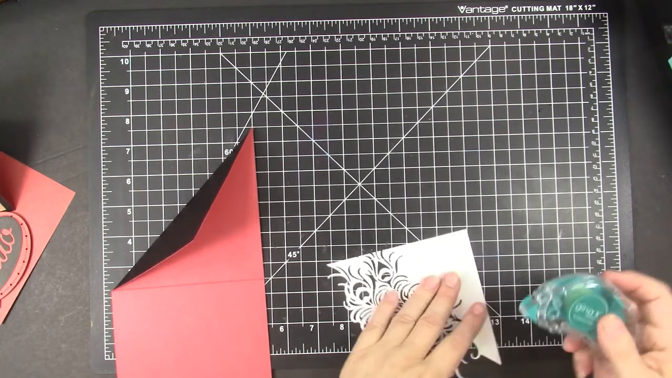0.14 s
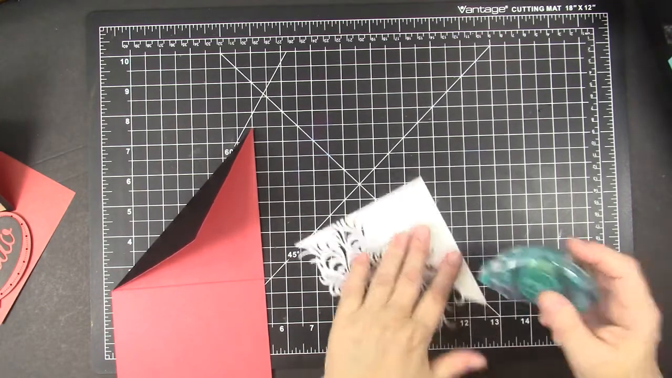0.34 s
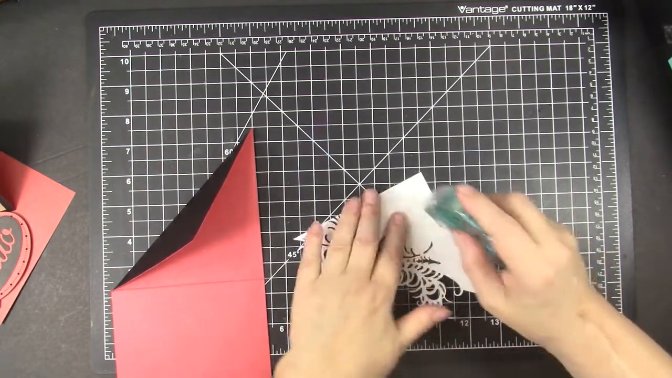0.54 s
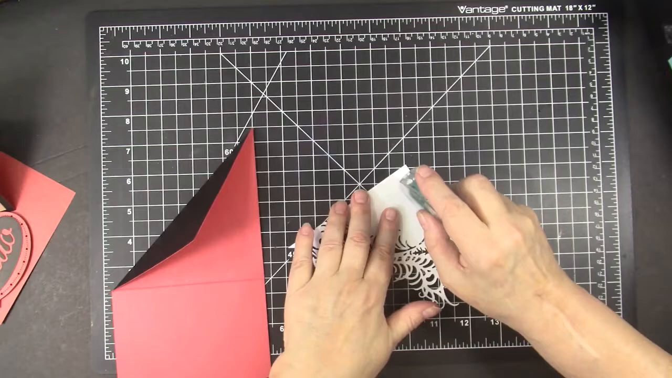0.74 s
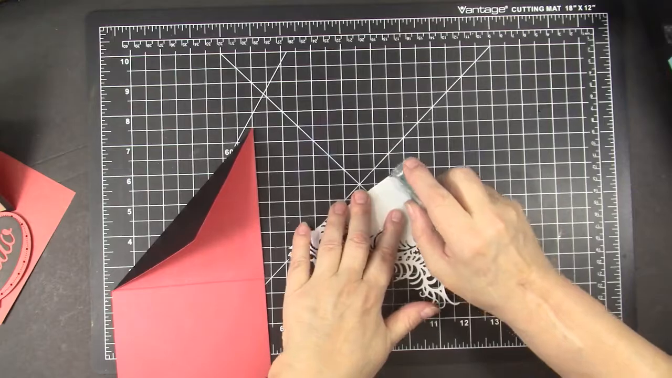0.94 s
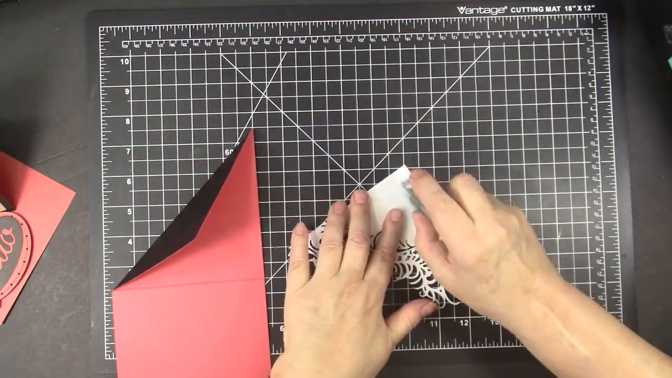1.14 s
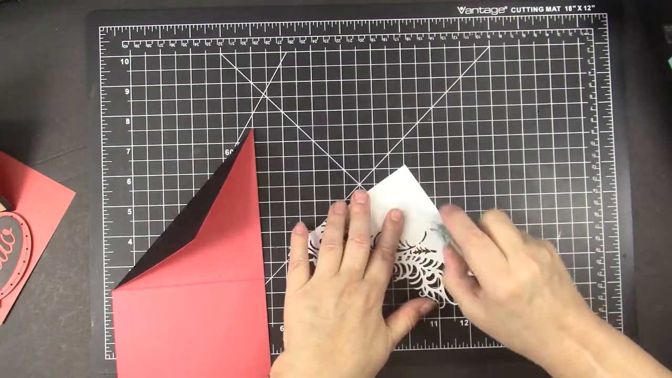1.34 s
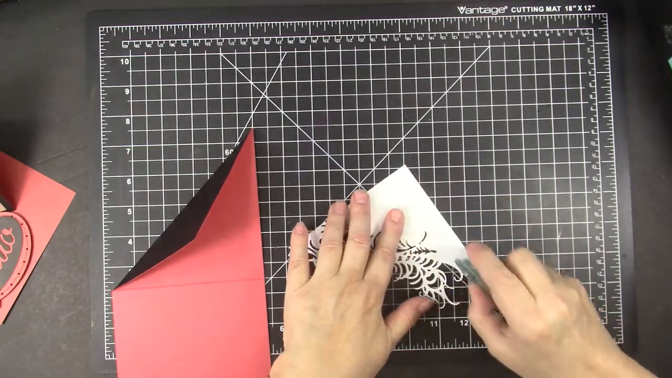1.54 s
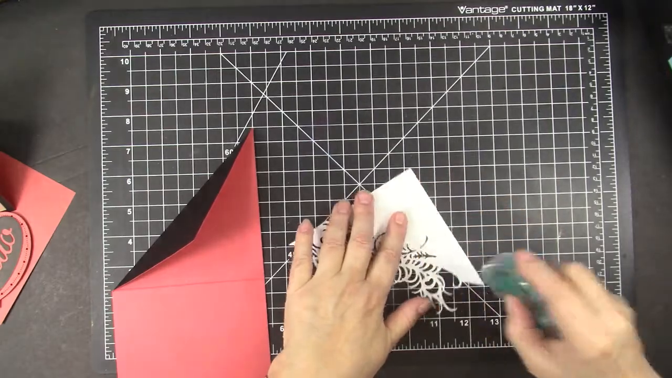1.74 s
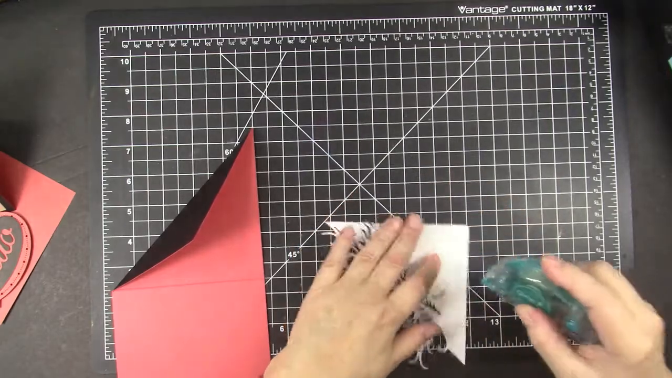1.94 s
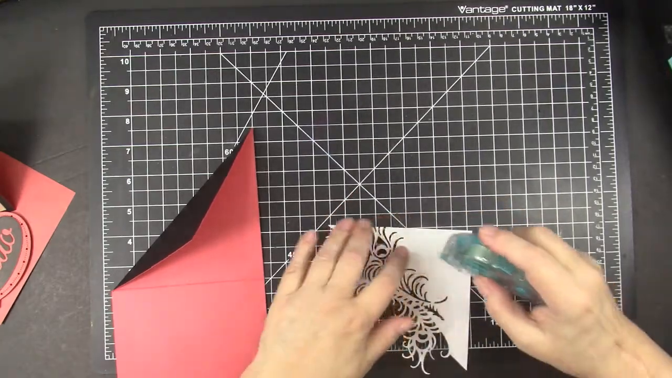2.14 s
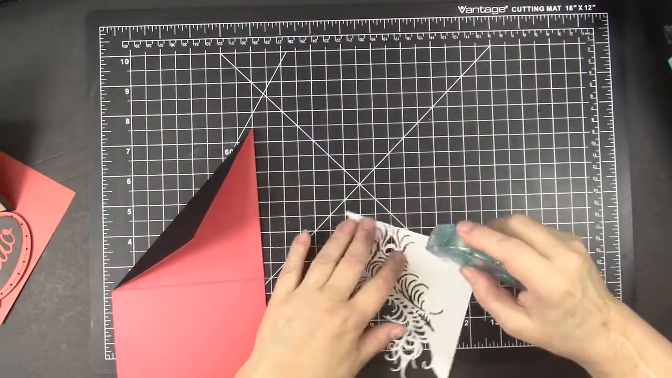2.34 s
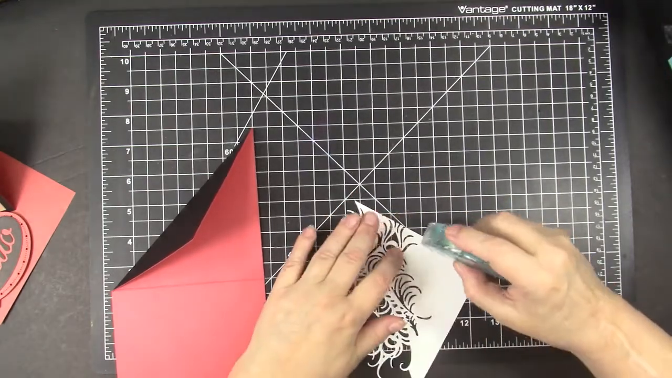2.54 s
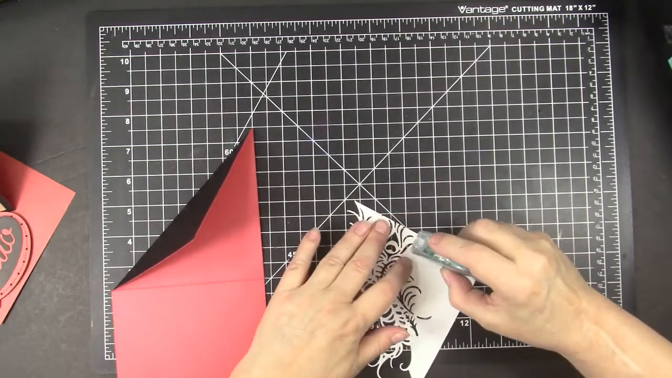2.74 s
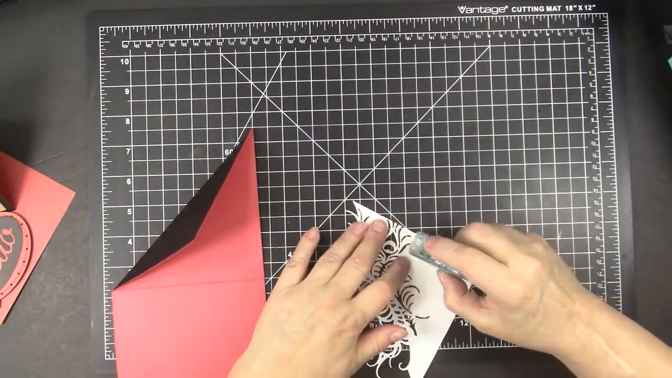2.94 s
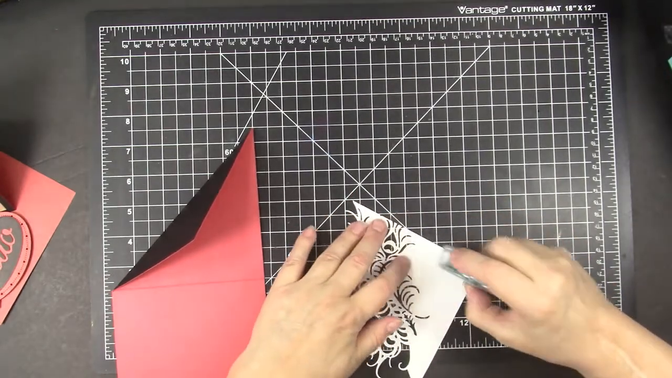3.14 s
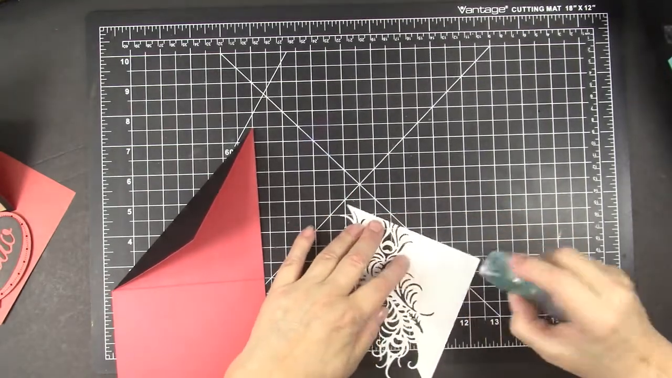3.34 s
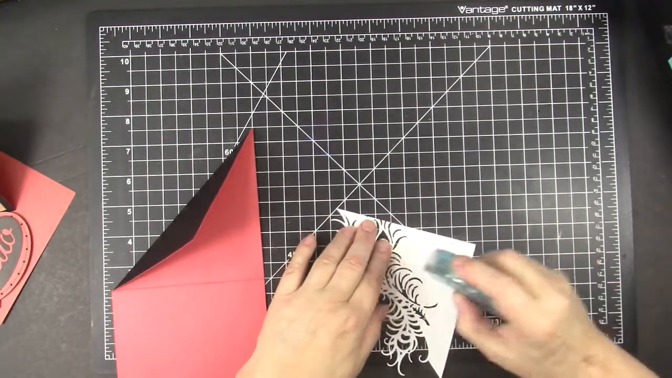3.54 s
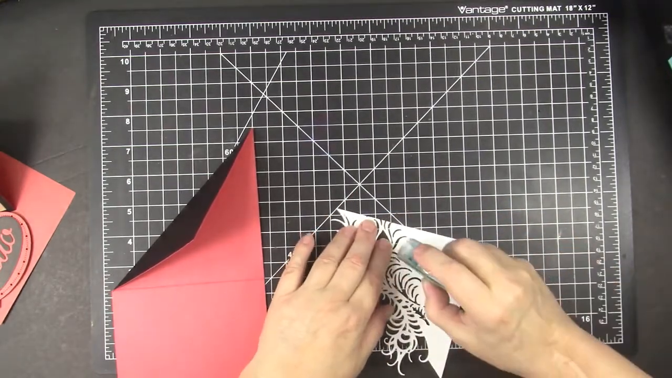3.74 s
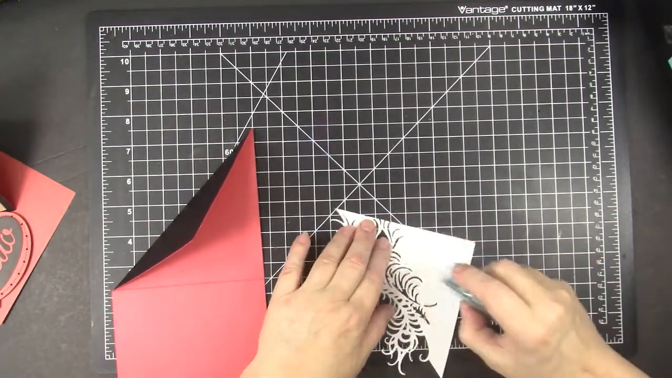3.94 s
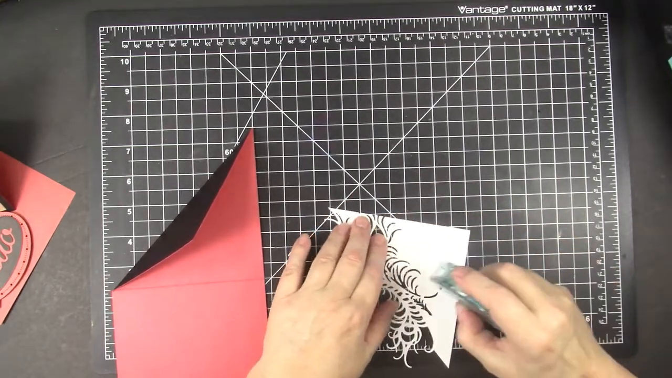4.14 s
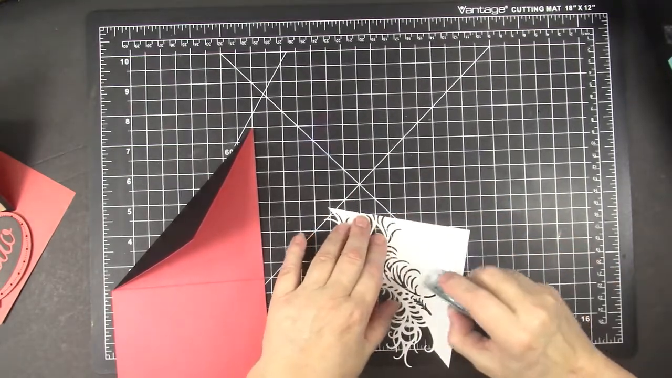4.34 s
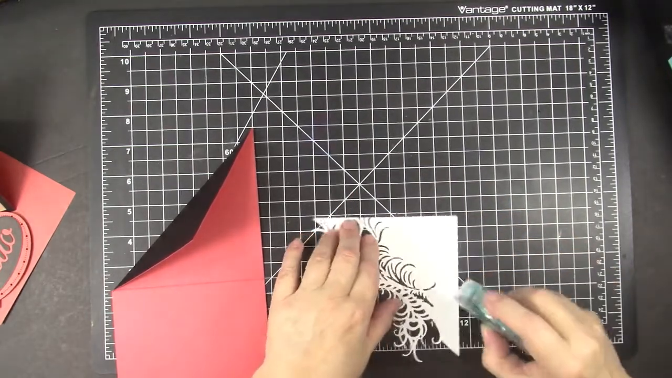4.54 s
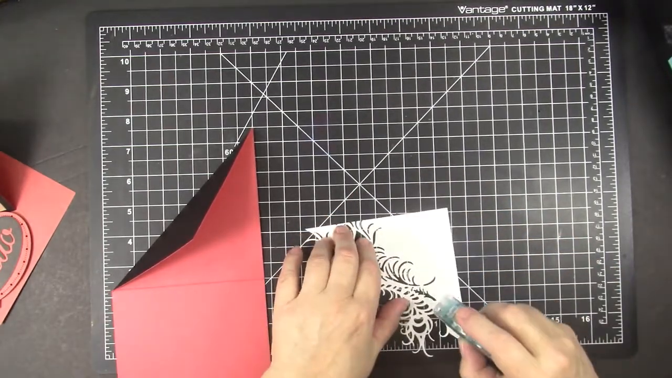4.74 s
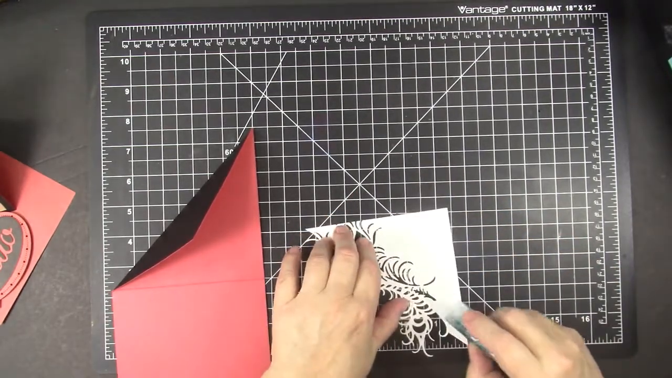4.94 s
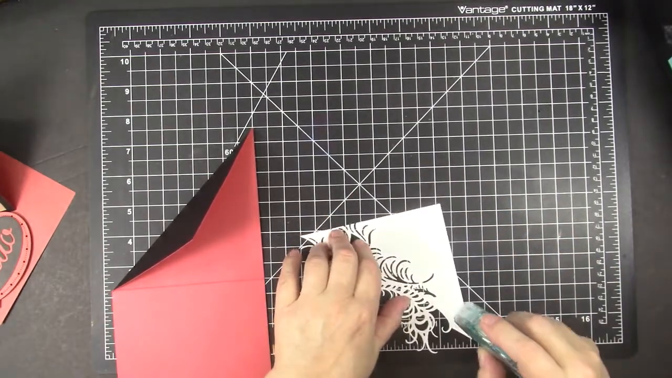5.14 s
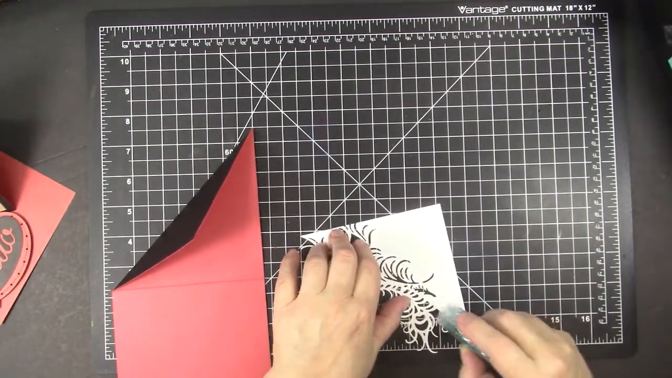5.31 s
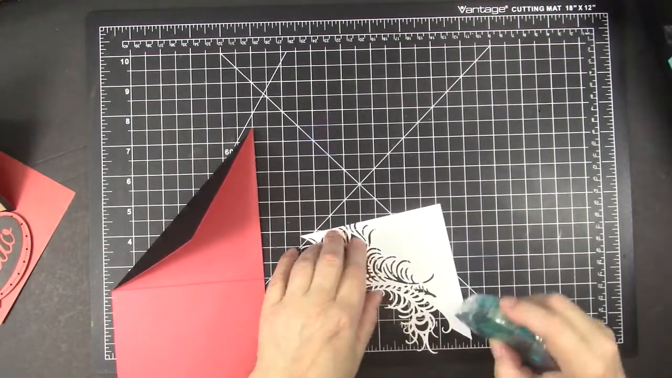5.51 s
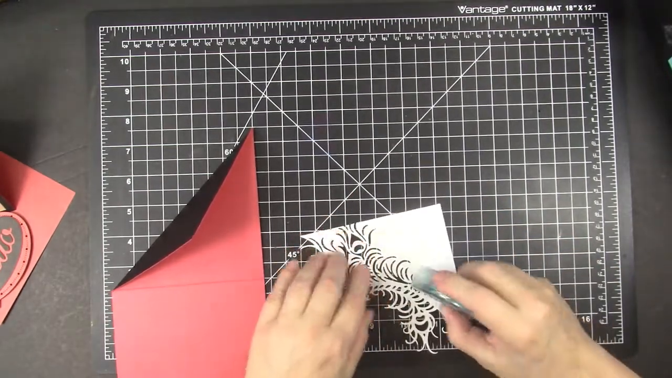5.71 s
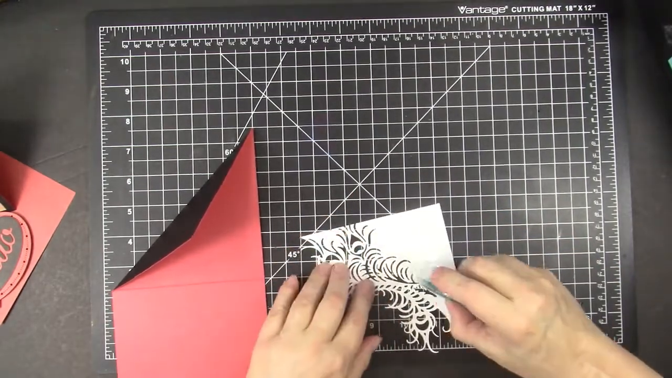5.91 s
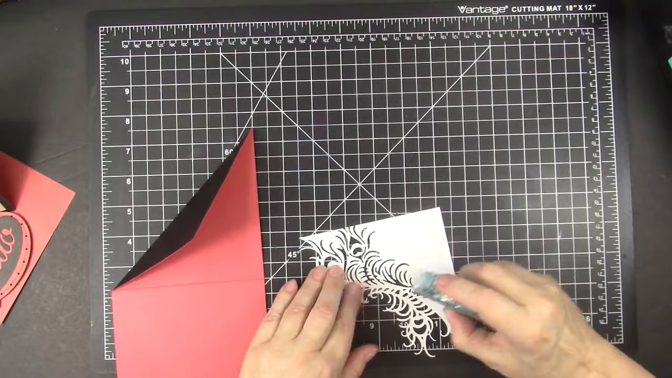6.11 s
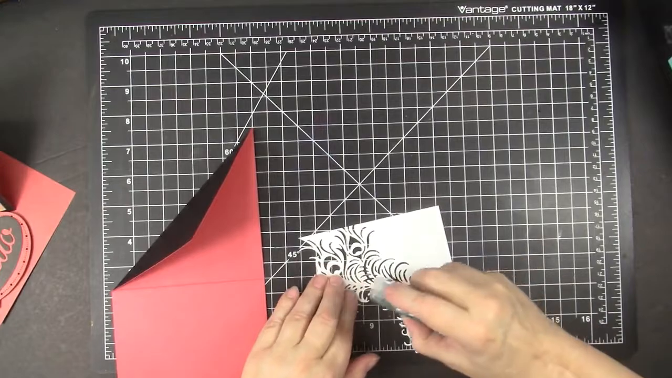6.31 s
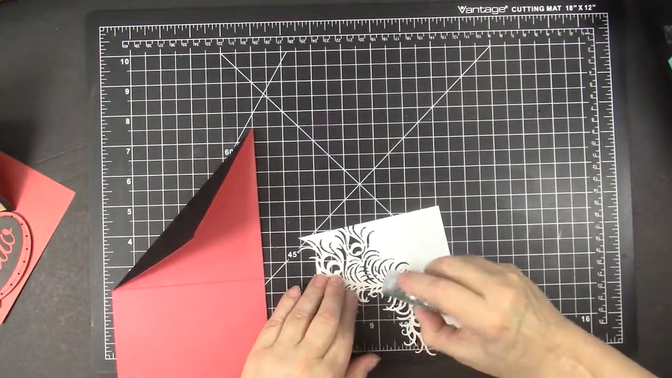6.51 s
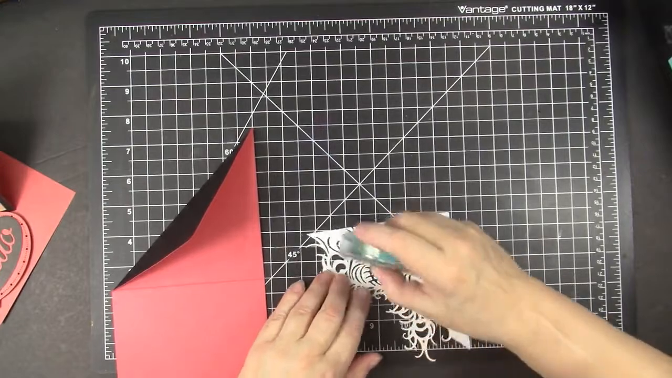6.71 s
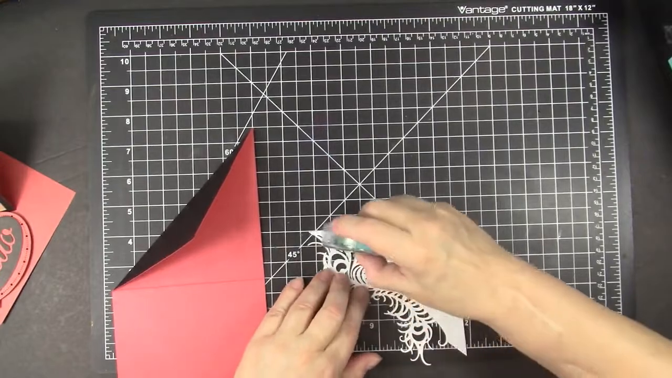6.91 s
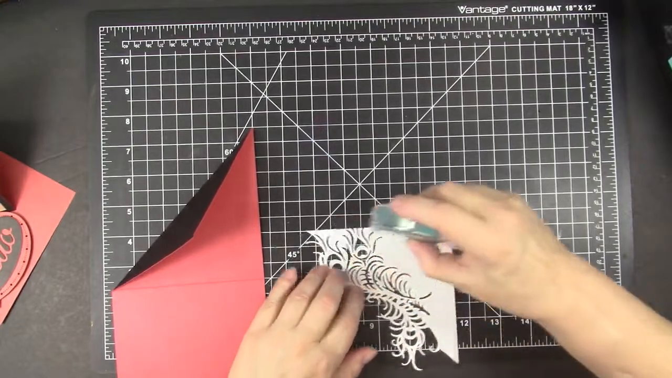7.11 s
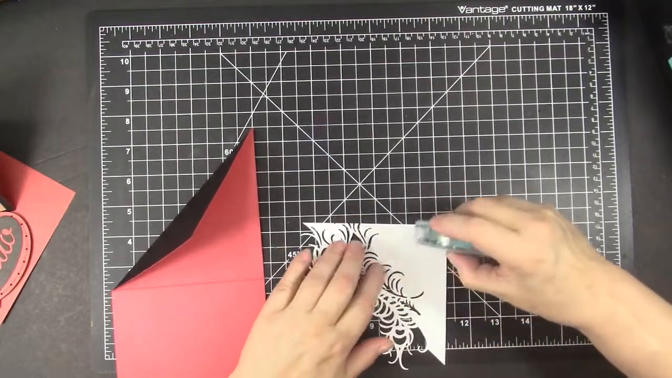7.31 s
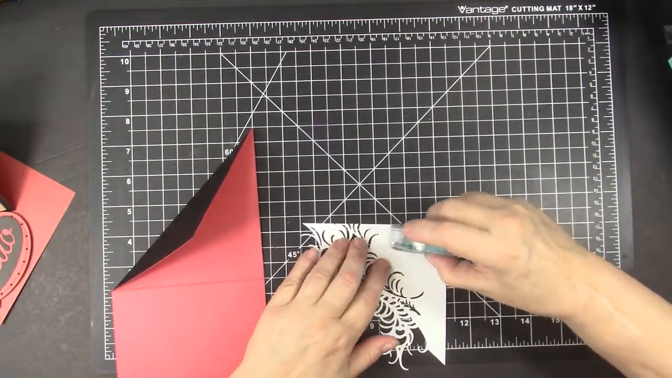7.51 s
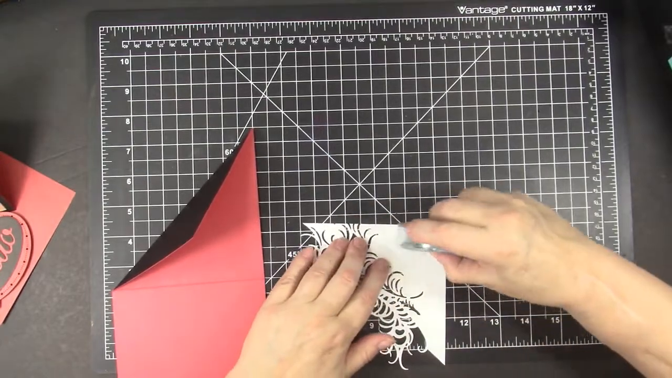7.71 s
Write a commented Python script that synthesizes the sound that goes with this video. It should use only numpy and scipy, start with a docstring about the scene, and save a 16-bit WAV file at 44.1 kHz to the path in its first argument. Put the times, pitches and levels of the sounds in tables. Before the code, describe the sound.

A hollow plastic dispenser clicks and grinds over paper on a desk, heard near the microphone with little echo. It opens with a sharp tick and paper hiss, then a long rapid ratchet run. After more paper sliding comes a second run, followed by brief zips of a few clicks, with taps, bouncing landings and loose ticks between them, over low room noise.

```python
"""In a quiet room with a faint hum, a plastic tape runner is set down on paper and rolled in short strokes.
A sheet slides over a cutting mat as shaped noise; loose parts tick, and pats and landings strike mat and desk.
The pawl clicks once a ratchet tooth and roller and gears grind, all as impacts or rough noise that
excite damped resonances of shell, cavity, mat and desk. Sparse echoes add the room."""
import sys
import numpy as np
from scipy import signal
from scipy.fft import rfft, irfft, next_fast_len
from scipy.io import wavfile

SR = 44100
rng = np.random.default_rng(int(sys.argv[2]) if len(sys.argv) > 2 else 0)


def waveform_to_disk(signal):
    """Save audio, clipped to [-1, 1], as 16-bit WAV at the path in sys.argv[1]."""
    frames = np.transpose(np.atleast_2d(signal))
    scaled = np.clip(frames, -1, 1) * 32767
    samples = np.round(scaled).astype(np.int16)
    wavfile.write(sys.argv[1], SR, samples)


N = 346626  # samples


def gain_of(db):
    """Decibel law: 20 dB is a factor of ten in amplitude."""
    return 10 ** (np.asarray(db) / 20)


def evened(x):
    """Normalisation to an rms of 1."""
    return x / np.sqrt(np.mean(x ** 2) + 1e-20)


def read(points, hz):
    """Interpolation of a curve over logarithmic frequency."""
    f, value = np.transpose(points)
    return np.interp(np.log(hz + 1), np.log(f + 1), value)


def coloured(x, points):
    """Spectral shaping: each frequency is weighted by the curve, then the rms is set to 1."""
    size = next_fast_len(N)
    weight = gain_of(read(points, np.fft.rfftfreq(size, 1 / SR)))
    return evened(irfft(rfft(x, size) * weight, size)[:N])


def grit(per_s, spread_db, smooth):
    """Granular friction: noise roughened by random grains of uneven size."""
    grain_db = spread_db * np.minimum(rng.exponential(1, N), 4)
    grains = gain_of(grain_db) * (rng.random(N) < per_s / SR)
    lumps = signal.oaconvolve(grains, np.exp(-np.arange(400) / 60))[:N]
    return evened((smooth + evened(lumps)) * rng.standard_normal(N))


def blows(s, db, snap_db, rise, fall):
    """Impact excitation: a clean snap at each time, and a rattle of micro-impacts that dies away."""
    train, t = np.zeros(N), np.arange(2048) / SR
    np.add.at(train, np.clip((s * SR).astype(int), 0, N - 1), gain_of(db))
    shape = (1 - np.exp(-t / rise)) * np.exp(-t / fall)
    rattle = abs(signal.oaconvolve(train, shape / shape.max())[:N]) * rng.standard_normal(N)
    return rattle + gain_of(snap_db) * train


def ring(drive, modes, rise, alternate=True):
    """Modal superposition: damped sines, in step or of alternate sign, swell over the contact time."""
    t = np.arange(4096) / SR
    shape = 0
    for k, (hz, width, db) in enumerate(modes):
        sign = (-1) ** (k * alternate)
        decay = np.exp(-np.pi * width * t)
        shape = shape + sign * gain_of(db) * width * decay * np.sin(2 * np.pi * hz * t)
    shape = shape * (1 - np.exp(-t / rise))
    # unit energy: steady white noise passes at unchanged level
    return signal.oaconvolve(drive, shape / np.linalg.norm(shape))[:N]


def resonate(x, hz, width):
    """Heterodyne resonance of gain 1: shift the curve hz to zero, smooth twice, shift back."""
    turn = np.exp(2j * np.pi * np.cumsum(hz) / SR)
    r = np.exp(-np.pi * width / SR)  # one smoothing pass
    smoothed = signal.lfilter([(1 - r) ** 2], [1, -2 * r, r * r], x / turn + 1e-18)
    return 2 * (turn * smoothed).real


# spectrum of the room noise: (frequency [Hz], relative density [dB per Hz])
AIR_SPECTRUM = [(12, -46), (20, -13), (81, -22.5), (107, -10), (183, -5), (216, -4.5), (379, -3), (546, -4),
                (628, -7), (722, -7.5), (879, -7.5), (1340, -9.5), (2280, -15), (5910, -24), (16200, -39)]
AIR_DB = -57  # rms
HUM_HZ, HUM_DB = 120, -72.5  # mean pitch and level


def air():
    """Stationary noise plus a low sine whose phase and level waver together."""
    t = np.arange(N) / SR
    waver = evened(sum(np.sin(2 * np.pi * (f * t + rng.random())) / np.sqrt(f)
                       for f in np.geomspace(.5, 12, 20)))
    hum = np.sqrt(2) * np.sin(2 * np.pi * HUM_HZ * t + 0.17 * waver)
    hum = hum * gain_of(HUM_DB + 2.1 * waver)
    return gain_of(AIR_DB) * coloured(rng.standard_normal(N), AIR_SPECTRUM) + hum


# the sheet slides on the mat:
# (start [s], length [s], share of it spent swelling [0-1], hiss level [dB], scrape level [dB])
SLIDES = [(0.0, 0.22, 0.067, -56.5, -47), (0.161, 0.12, 0.25, -56.5, -54), (0.216, 0.2, 0.76, -50, -50),
          (0.571, 0.029, 0.2, -54, -55), (0.623, 0.076, 0.67, -57.5, -54.5), (.8, 0.12, 1, -70, -68),
          (1.737, 0.11, 0.44, -66, -57.5), (1.796, 0.22, 0.58, -52.5, -53), (2.144, 0.068, .5, -72, -67),
          (2.228, 0.042, .4, -59, -61), (2.277, 0.22, .25, -62, -59.5), (2.403, .22, 0.43, -83, -58),
          (3.394, 0.1, 0.63, -65, -58), (4.48, 0.2, 0.69, -65, -61), (5.444, 0.29, .25, -71, -64.5),
          (5.627, 0.25, 0.64, -71, -65), (6.527, 0.24, 0.44, -79, -57.5), (6.66, 0.3, 0.37, -68, -61),
          (7.072, 0.16, 0.72, -67, -67)]
SLIDE_BLUNT = 0.87  # power of the swell: smaller is flatter


def sliding():
    """Amplitude envelopes of hiss and scrape: each slide swells and fades."""
    t, out = np.arange(N) / SR, 0
    for start, length, share, hiss_db, scrape_db in SLIDES:
        done, share = (t - start) / length, np.clip(share, .05, .95)
        swell = np.clip(np.minimum(done / share, (1 - done) / (1 - share)), 0, 1) ** SLIDE_BLUNT
        out = out + swell * gain_of([[hiss_db], [scrape_db]])
    return out


# spectra of fibres and of the sheet's edge: (frequency [Hz], relative density [dB per Hz])
HISS_SPECTRUM = [(1760, -31), (3000, -14), (4050, -7), (5220, -16), (6220, -5.5), (8050, -4), (10400, -2.5),
                 (14400, -16), (16000, -21)]
SCRAPE_SPECTRUM = [(120, -49), (200, -14), (281, -7.5), (470, 2), (512, -7), (661, 3.5), (999, -1),
                   (1600, 0.5), (6000, -8), (7800, -57), (13200, -120)]


def sheet():
    """Sliding friction: fibres hiss and the edge of the sheet scrapes."""
    hiss, scrape = sliding()
    hiss = hiss * coloured(grit(590, 4.7, 1.7), HISS_SPECTRUM)
    return hiss + scrape * coloured(grit(230, 5.6, 2.9), SCRAPE_SPECTRUM)


# loose parts tick in the shell: (time [s], shell body level [dB], pitch the struck spot favours [Hz],
# cavity relative to body [dB], treble relative to body [dB])
TICKS = [(0.0054, -15.5, 2740, -8, -16), (0.0704, -34, 2610, -7, -16), (0.1552, -39, 2890, -6, -18),
         (0.5192, -49, 3480, 0, -16), (0.6487, -38, 2940, -2, -16), (0.6584, -43.5, 2450, 5.5, -13),
         (1.064, -30, 2800, -6.5, -20), (1.0875, -31.5, 2620, -11, -28), (1.1017, -25, 2720, -12, -23),
         (1.117, -26, 2930, -14, -23), (1.2386, -26, 2770, -22, -16), (1.341, -27, 3200, -6.5, -16),
         (1.5712, -33, 2750, -3, -16), (1.6069, -27.5, 2610, -4.5, -24), (1.7025, -27, 3070, -5.5, -12),
         (1.8018, -27, 2570, -15, -16), (1.818, -40, 3090, -4, -20), (1.8382, -40, 2860, -6, -16),
         (2.0415, -46, 2420, -5, -18), (2.8069, -36, 2940, 0.5, -21), (2.8174, -59, 2850, -7, -16),
         (2.9599, -41, 3150, -15, -16), (3.0076, -48, 3040, -9, -21), (3.024, -45, 3100, -7, -24),
         (3.346, -25.5, 2890, -5.5, -9.5), (3.3944, -38, 2440, -5, -16), (3.4034, -40, 3500, -10, -16),
         (3.419, -37, 3110, -13, -16), (3.4437, -46, 3170, -13, -16), (3.5165, -44.5, 3270, -8, -20),
         (3.8242, -26.5, 3150, -9.5, -16), (4.0247, -43, 2850, -9, -6), (4.0394, -52, 2660, -9, -10),
         (4.0911, -52, 2810, -7, -16), (4.144, -44.5, 2880, -7, -21), (4.4967, -37, 2920, -14, -16),
         (5.025, -31, 2840, -6, -12), (5.0646, -34, 2820, 2, -7), (5.127, -39, 2860, -7, -21),
         (5.1414, -56, 2480, -7, -16), (5.3423, -25.5, 2840, -10, -16), (5.5546, -40, 2950, -16, -25),
         (5.625, -43, 2610, -16, -16), (5.887, -21, 3130, -9, -20), (6.0264, -28, 3170, -8, -12.5),
         (6.4244, -27, 3180, -9, -22), (6.5084, -38, 2490, -2, -16), (6.5203, -34, 2400, -10, -6),
         (6.6276, -46.5, 2450, -9, -16), (6.8695, -41, 2610, -8, -19), (6.9352, -34, 2740, -2.5, -18),
         (7.0263, -37.5, 3310, -3, -14), (7.073, -45, 2510, -2, -9), (7.1272, -49, 2510, -1, -16),
         (7.1736, -38, 3130, -5, -24), (7.3625, -38, 3080, -8.5, -19), (7.5724, -45, 2960, -9, -12),
         (7.6863, -32, 2900, -3.5, -26)]
TICK_MAT_DB, TICK_DESK_DB = -18.5, -32  # relative to body


def ticks():
    """Impact of light parts: the shell answers most, the mat and desk little."""
    return [(s, db, hz, cavity_db, TICK_MAT_DB, TICK_DESK_DB, treble_db)
            for s, db, hz, cavity_db, treble_db in TICKS]


# fingers, sheet and roller pat the mat:
# (time [s], mat level [dB], desk relative to mat [dB], treble relative to mat [dB])
PATS = [(0.182, -45, 2.5, 3.5), (0.193, -49, 11.5, -12), (0.5708, -46, -24, -7), (0.5792, -42.5, -32, -8.5),
        (0.98, -37.5, -3.5, -20), (2.2342, -36.5, -27, -20), (2.241, -37.5, -18, -27),
        (3.829, -45, 5.5, -21), (5.348, -58, 5, -21), (5.533, -46, -25, -22), (5.8795, -42, 0, -21),
        (5.892, -45, 4, -21), (6.428, -50, 7, -21), (6.384, -44, 2.5, -21), (6.645, -50, -10, -21),
        (6.9348, -51, 7.5, -21), (7.2772, -50, -3, -18)]
PAT_BODY_DB, PAT_CAVITY_DB, PAT_HZ = -10, -8.5, 2950  # levels relative to mat


def pats():
    """Soft impact: levels relative to the mat are restated relative to the shell body."""
    return [(s, db + PAT_BODY_DB, PAT_HZ, PAT_CAVITY_DB - PAT_BODY_DB, -PAT_BODY_DB,
             desk_db - PAT_BODY_DB, treble_db - PAT_BODY_DB) for s, db, desk_db, treble_db in PATS]


# the runner lands and bounces once: (time [s], shell body level [dB], mat, desk and treble relative
# to body [dB], bounce delay [s], bounce body level [dB], pitch the struck spot favours [Hz])
LANDINGS = [(0.9872, -25.5, -9, -38, -9.5, .011, -42, 3070),
            (3.7808, -17, -6, -12.5, -13.5, 0.01, -37, 3370),
            (4.3101, -15, -12.5, -8, -14.5, .0094, -33, 2915),
            (4.862, -26.5, -0.5, 0, -9, .0072, -23, 3390), (5.296, -21, -1, -0.8, -8.5, .0098, -19.5, 2940),
            (5.8426, -19.5, -33, -7, -17.5, .0085, -30, 3120),
            (6.3897, -21.5, -14, -5, -15.5, .011, -29.5, 2870),
            (6.8873, -27.5, -7, -10.5, -19.5, .0117, -39, 2590),
            (7.631, -25.5, -17, -11.5, -18, .0108, -26, 2920)]
LAND_CAVITY_DB, BOUNCE_CAVITY_DB, BOUNCE_TREBLE_DB = -9, -8.5, -10.5  # relative to body
BOUNCE_MAT_DB, BOUNCE_DESK_DB = -19, -17  # relative to the landing's mat and desk


def landings():
    """Impact and rebound: mat and desk answer to the weight of the landing, also in the bounce."""
    rows = []
    for s, db, mat_db, desk_db, treble_db, delay, bounce_db, hz in LANDINGS:
        drop_db = db - bounce_db
        rows.append((s, db, hz, LAND_CAVITY_DB, mat_db, desk_db, treble_db))
        rows.append((s + delay, bounce_db, hz, BOUNCE_CAVITY_DB, drop_db + mat_db + BOUNCE_MAT_DB,
                     drop_db + desk_db + BOUNCE_DESK_DB, BOUNCE_TREBLE_DB))
    return rows


SPOT_DB, SPOT_WIDTH_HZ = 21.5, 210  # width of one smoothing pass


def knocks():
    """Impact excitation by ticks, pats and landings: the drive of each part, and the struck spot's ring."""
    at, db, spot_hz, cavity_db, mat_db, desk_db, treble_db = np.transpose(
        sorted(ticks() + landings() + pats()))
    struck = blows(at, db - 14.5, 26.4, 0.00072, 0.0019)
    latest = np.maximum(np.searchsorted(at, np.arange(N) / SR) - 1, 0)
    spot = gain_of(SPOT_DB) * resonate(struck, spot_hz[latest], SPOT_WIDTH_HZ)
    edge = blows(at, db + treble_db - 2.0, 15.3, 0.00038, 0.0042)
    drives = {
        "body": gain_of(-0.5) * struck,
        "lid": blows(at, db + treble_db - 4.5, 11.0, 0.00039, 0.0043),
        "treble": signal.lfilter([.6], [1, -.45], edge),  # a blunt knock is duller than the pawl
        "cavity": blows(at, db + cavity_db - 9.5, 25.0, 0.00065, 0.0084),
        "mat": blows(at, db + mat_db - 12, 28.8, 0.002, 0.0063),
        "desk": blows(at, db + desk_db - 5.5, 26.4, 0.001, 0.0073),
    }
    return drives, spot


SHUDDER_DB, SHUDDER_DESK_DB = -23.5, -20.5  # relative to the landing's body and desk
SHUDDER_DB_PER_S = 358


def shudder():
    """Exponential decay of the scuffing after each landing: its gain in shell and desk."""
    t, shell, desk = np.arange(N) / SR, 0, 0
    for s, db, _, desk_db, *_ in LANDINGS:
        fade = (t > s) * gain_of(db - SHUDDER_DB_PER_S * abs(t - s))
        shell = shell + gain_of(SHUDDER_DB) * fade
        desk = desk + gain_of(desk_db + SHUDDER_DESK_DB) * fade
    return shell, desk


# how far the roller has turned, one table a stroke: (time [s], ratchet teeth passed [count])
TRAVEL = [
    [(1.1272, 0), (1.1496, 1), (1.2199, 5), (1.2606, 8), (1.3765, 16), (1.4388, 20), (1.5272, 26),
     (1.565, 28), (1.6846, 33), (1.7018, 34)],
    [(3.0561, 0), (3.0817, 1), (3.1215, 3), (3.138, 4), (3.2026, 9), (3.2324, 11), (3.2843, 14),
     (3.3127, 16), (3.3243, 17)],
    [(3.8462, 0), (3.8792, 2), (3.9135, 5), (3.9396, 8), (3.9594, 10), (3.9853, 13)],
    [(4.3614, 0), (4.4047, 3), (4.4439, 6), (4.4545, 7)],
    [(4.9185, 0), (4.973, 3), (5.0044, 5), (5.04, 7)],
    [(5.3511, 0), (5.4087, 3)],
    [(5.9078, 0), (5.944, 2), (5.9747, 4), (5.9922, 5)],
    [(6.4401, 0), (6.4586, 1)],
    [(6.9577, 0), (6.9993, 2)],
    [(7.7183, 0), (7.7367, 1), (7.751, 2), (7.7903, 5), (7.8267, 8), (7.8548, 10)],
]
# the same strokes: (pawl click level [dB], shell body relative to click [dB], grinding level [dB],
# mat and desk relative to grinding [dB], change of body and grinding from start to end [dB])
STROKES = [(-25.5, 2, -45, -8, -18, -4), (-25, 4, -44.5, -5, -14.5, -1.5), (-25, 3, -44, -5, -16, -1.5),
           (-26.5, 1.5, -50, -6.5, -13, 0.5), (-26, -0.5, -47, -11, -16.5, 1.5),
           (-26, -10, -48, -7.5, -17, 2), (-25, -1.5, -51, -4.3, -11, 4.5), (-25, -0.5, -44.5, -16, -28, 0),
           (-24, -1.5, -48.5, -8.5, -16, 0), (-25.5, 4, -45.5, -2, -15.5, -1.5)]
USUAL_TEETH_PER_S = 60


def teeth():
    """Kinematics of the ratchet: tooth times, speed in doublings, share of the stroke done, its row."""
    rows = []
    for travel, stroke in zip(TRAVEL, STROKES):
        at, passed = np.transpose(travel)
        s = np.interp(np.arange(passed[-1] + 1), passed, at)
        speed = np.log2(1 / np.gradient(s) / USUAL_TEETH_PER_S)
        rows.append((s, speed, (s - s[0]) / (s[-1] - s[0]), stroke))
    return rows


CLICK_SPREAD_DB, BODY_SPREAD_DB = 0.44, 4


def pawl():
    """Ratchet impact: each tooth drives treble, lid, body and cavity, now and then barely stirring the body."""
    rows = []
    for s, _, done, (click_db, body_db, *_, change_db) in teeth():
        rows.append(np.transpose([s, click_db + 0 * s, body_db + change_db * done]))
    s, click_db, body_db = np.concatenate(rows).T
    chance = rng.standard_normal((len(s), 2))
    click_db = click_db + CLICK_SPREAD_DB * chance[:, 0]
    body_db = click_db + body_db - BODY_SPREAD_DB * chance[:, 1] ** 2
    rebound = s + .0016 + 0.00045 * rng.standard_normal(len(s))  # the pawl bounces once on the next tooth
    treble = blows(s + .0004, click_db - 9.5, 20.75, 0.00006, 0.0035)
    return {
        "body": blows(s, body_db - 12, 20.1, 0.00055, 0.004),
        "lid": blows(s, click_db - 14, 21.1, 0.00019, 0.0022),
        "treble": treble + blows(rebound, click_db - 17.5, 20.5, 0.00036, 0.0011),
        "cavity": blows(s, body_db - 23, 22, 0.00049, 0.0049),
    }


GRIND_DB_PER_DOUBLED_SPEED, GRIND_ARCH_DB = 3.5, 5.0
START_DB_PER_S, STOP_DB_PER_S = 1100, 247


def grinding():
    """Speed-dependent rolling noise: gain in shell, mat and desk arches over each stroke, starts and stops."""
    t, out = np.arange(N) / SR, 0
    for s, speed, done, (_, _, grind_db, mat_db, desk_db, change_db) in teeth():
        db = grind_db + change_db * done + GRIND_DB_PER_DOUBLED_SPEED * speed
        db = db + GRIND_ARCH_DB * np.sin(np.pi * done)
        db = np.interp(t, s, db)
        db = db - START_DB_PER_S * np.maximum(s[0] - t, 0) - STOP_DB_PER_S * np.maximum(t - s[-1], 0)
        out = out + gain_of(db) * gain_of([[0], [mat_db], [desk_db]])
    return out


GRIND_CAVITY_DB, GRIND_TREBLE_DB = -2, -10.5


def friction():
    """Frictional excitation: roller, gears and scuffing drive every part with rough noise."""
    roll, roll_mat, roll_desk = grinding()
    scuff, scuff_desk = shudder()
    grind = roll + scuff
    return {
        "body": grind * grit(400, 2.34, 0.24),
        "lid": gain_of(-10.0) * grind * grit(750, 5.7, 0.43),
        "cavity": gain_of(GRIND_CAVITY_DB) * grind * grit(170, 3.0, 1.0),
        "mat": (roll_mat + scuff) * grit(150, 10.0, 2.0),
        "desk": (roll_desk + scuff_desk) * rng.standard_normal(N),
        "treble": gain_of(GRIND_TREBLE_DB) * grind * grit(330, 6.9, 0.42),
    }


# resonances of shell body, lid, cavity, mat, desk and treble:
# (frequency [Hz], width [Hz], relative strength [dB])
BODY_MODES = [(2596, 310, 3), (2686, 230, 5), (2910, 290, 3.5), (3120, 350, 5), (3340, 1090, -1)]
LID_MODES = [(3840, 390, -2), (4020, 194, 4), (4490, 1300, -0.5)]
CAVITY_MODES = [(1207, 200, -2), (1396, 28, 1), (1540, 54, 3.5), (1920, 360, -4)]
MAT_MODES = [(465, 42, -10), (616, 51, 2), (860, 410, -4)]
DESK_MODES = [(114, 12.6, -5), (172, 13, -13), (227, 44, -4.5), (306.6, 46, 1), (360, 75, -7.5)]
TREBLE_MODES = [(6180, 810, 2), (6650, 230, 0.5), (7010, 240, 1.5), (7790, 320, -3), (8395, 520, 0),
                (9180, 500, -5), (9950, 960, -3), (11540, 680, -9), (12800, 750, -11), (14250, 1100, -14.5),
                (15600, 900, -18)]
# the grip squeezes and tilts the runner: (time [s], lid facing the microphone [dB],
# lower and upper shifting bright resonance [Hz, Hz], side wall left free to ring [dB])
GRIP = [(1.1, 3.8, 7640, 11300, -4), (1.35, 4, 7800, 12000, 12), (1.53, 0.6, 8340, 12800, 6),
        (1.7, 3.3, 8640, 11700, 3), (3.2, 2.5, 8400, 12100, 14), (3.9, 0.7, 8350, 12200, 2),
        (4.4, 3.5, 8330, 12440, -1), (5.0, 1, 8400, 12200, -3), (5.4, 2, 8350, 12500, -6),
        (5.95, 3.5, 8360, 12500, -1), (6.45, 3, 8420, 12800, 0), (7.0, 5.5, 7780, 11600, -6),
        (7.8, 4.5, 9500, 12600, 4)]
WALL_HZ, WALL_WIDTH_HZ = 6180, 780  # width of one smoothing pass


def runner():
    """Source and resonator: knocks, pawl and friction excite the same shell, cavity, mat and desk."""
    knock, spot = knocks()
    click, rub = pawl(), friction()
    drive = {part: knock[part] + click.get(part, 0) + rub[part] for part in knock}
    t = np.arange(N) / SR
    grip_s, *curves = np.transpose(GRIP)
    lid_db, low_hz, high_hz, wall_db = [np.interp(t, grip_s, curve) for curve in curves]
    treble = drive["treble"]
    bright = ring(treble, TREBLE_MODES, 0.0002)
    bright += gain_of(9) * resonate(treble, low_hz, 440)
    bright += gain_of(0.5) * resonate(treble, high_hz, 800)
    bright += gain_of(wall_db) * resonate(treble, WALL_HZ + 0 * t, WALL_WIDTH_HZ)
    shell = spot + ring(drive["body"], BODY_MODES, 0.00029)
    shell += ring(drive["lid"] * gain_of(lid_db), LID_MODES, 0.00031)
    cavity = ring(drive["cavity"], CAVITY_MODES, 0.00046)
    mat = ring(drive["mat"], MAT_MODES, 0.00047)
    desk = ring(drive["desk"], DESK_MODES, 0.0011, alternate=False)
    return bright + shell + cavity + mat + desk


# decay of the room: (frequency [Hz], time to fall by 60 dB [s])
ROOM_DECAY = [(100, 0.35), (500, 0.16), (2000, 0.14), (6000, 0.18), (15000, 0.076)]
ROOM_DB = -10  # gain of the echoes


def room(x):
    """Reverberation: sparse echoes of random sign, each band dying at its own speed."""
    taps = np.zeros(SR // 2)
    at = np.arange(120, len(taps) - 20, 20)
    taps[at + rng.integers(0, 20, len(at))] = rng.choice([-1., 1.], len(at))
    hz, t, z = signal.stft(taps, SR, nperseg=256)
    decay = gain_of(-60 * t / read(ROOM_DECAY, hz)[:, None])
    tail = signal.istft(z * decay, SR, nperseg=256)[1]
    return signal.fftconvolve(x, tail / np.linalg.norm(tail))[:N]


def scene():
    """Superposition of direct sound, its reverberation and the room noise."""
    near = runner() + sheet()
    # the microphone passes little deep bass
    near = signal.sosfilt(signal.butter(4, 95, "high", fs=SR, output="sos"), near)
    return (near + gain_of(ROOM_DB) * room(near) + air())[None]


EDGE_HZ = 15800


def record(dry):
    """Low-pass filtering: the band limit of the recorder."""
    band = signal.firwin(511, EDGE_HZ, window=("kaiser", 9), fs=SR)
    return signal.oaconvolve(dry, band[None], "same")


dry = scene()
out = record(dry)
waveform_to_disk(out)
```